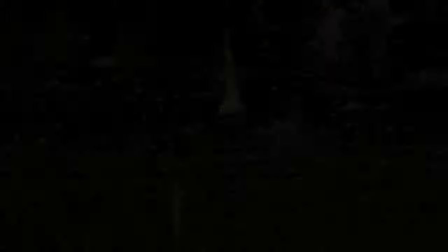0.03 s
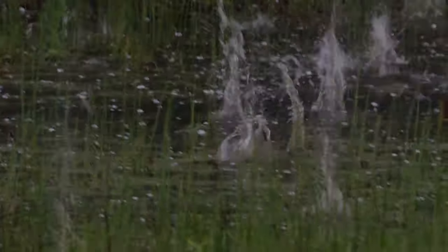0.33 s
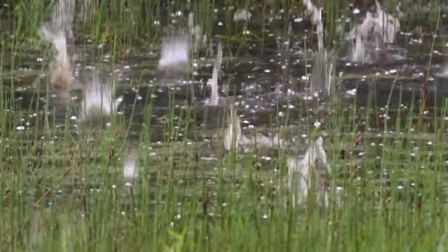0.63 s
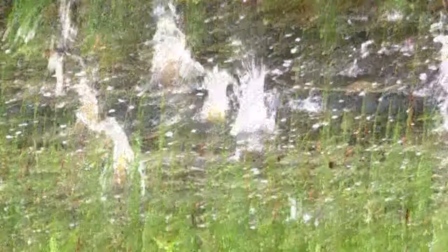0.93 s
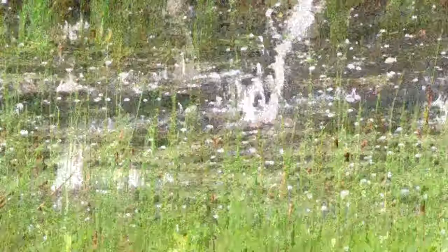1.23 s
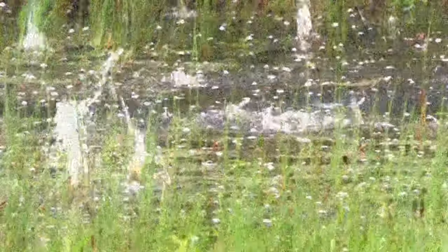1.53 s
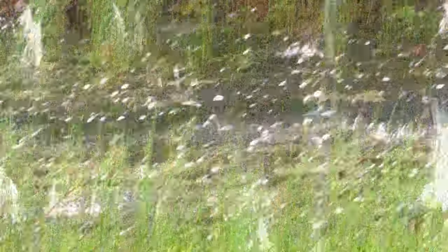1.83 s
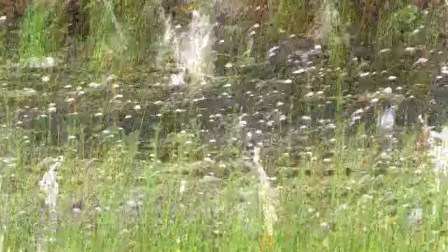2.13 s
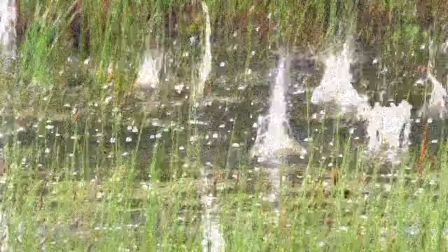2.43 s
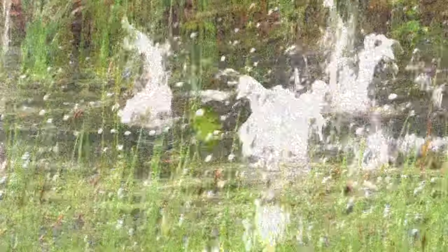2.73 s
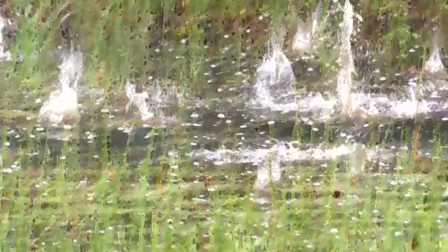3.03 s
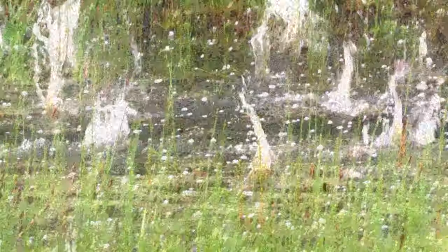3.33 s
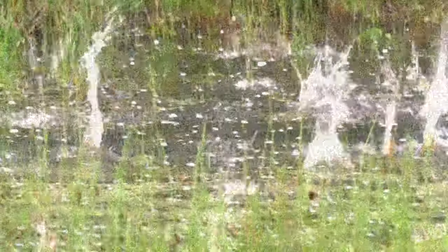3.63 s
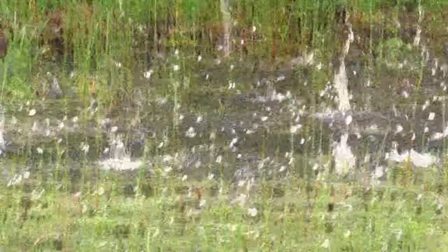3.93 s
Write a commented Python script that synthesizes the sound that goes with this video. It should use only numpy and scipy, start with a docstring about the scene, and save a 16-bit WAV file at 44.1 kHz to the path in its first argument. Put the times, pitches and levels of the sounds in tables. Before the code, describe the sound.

Heavy hail splashes into a reedy pond, thumping and plopping over a steady roar.

```python
"""Large hailstones pound a shallow pond with reeds, heard from a camera on the bank; the sound fades in.
Countless far splashes merge into a roar, with ticks of ice and ringing bubbles. Near stones thump, plunge and
splash, and thrown water patters back. The recorder has two narrow treble notches and overloads on the big hits."""
import sys
import numpy as np
from scipy import signal
from scipy.fft import rfft, irfft
from scipy.io import wavfile
from scipy.ndimage import uniform_filter1d

SR = 44100
rng = np.random.default_rng(int(sys.argv[2]) if len(sys.argv) > 2 else 0)


def log_audio(samples):
    """Write samples as a 16-bit WAV file to the path given in sys.argv[1]."""
    # one column per channel
    frames = np.atleast_2d(samples).T
    # limit to full scale, then quantise
    limited = np.clip(frames, -1, 1)
    pcm = np.round(limited * 32767).astype(np.int16)
    wavfile.write(sys.argv[1], SR, pcm)


N = 176400

# near stones: (s, plunge dB, splash dB, spray dB, rise time s, decay time s)
STONES = [(0.034, -9, -32, -40, 0.0018, 0.11), (.12, -14, -26, -40, .004, .04), (.19, -31, -15.5, -32, 0.012, 0.15), (0.361, -27, -13.5, -32, .008, 0.18), (.425, -14, -17, -18, 0.0072, 0.14), (0.495, -19, -2.5, -13, 0.0067, 0.094),
          (0.767, -14.5, -15, -22.5, 0.0076, 0.088), (1.005, -20, -17.5, -38, 0.0069, 0.15), (1.208, -12.5, -31, -22, .003, 0.067), (1.465, -22, -12.5, -40, .004, .04),
          (1.5, -22, -8.5, -24, .001, 0.13), (1.611, -17.5, -3.5, -14.5, 0.029, 0.089), (1.664, -10, -14, -25, 0.011, 0.14), (1.749, -10.5, -6, -19, 0.014, .07),
          (1.885, -14, -17, -16, 0.012, 0.078), (2.073, -3, -7, -32, 0.011, 0.042), (2.105, -17, -9.5, -24, 0.0063, .07), (2.14, -12.5, -17, -40, .006, 0.075), (2.26, -20.5, -28, -28, 0.0072, 0.12),
          (2.492, -9, -6, -9.5, .016, 0.071), (2.585, -15, -10.5, -21, 0.027, 0.1), (3.12, -37, -16.5, -37, 0.2, 0.23),
          (3.406, -19, -15, -24, 0.0078, .07), (3.566, -17, -40, -40, .005, .03), (3.59, -7.5, -1, -14, .001, 0.053), (3.629, -10, -7, -16, .003, 0.03), (3.73, -16.5, -16.5, -43, .006, 0.077),
          (3.857, -14, -18, -26, 0.0056, 0.094), (3.94, -13, -19, -22, 0.0092, 0.075)]
# deep thumps of collapsing craters: (s, dB, pitch Hz)
THUMPS = [(.04, -5, 109), (.515, -14, 114), (.625, -29, 100), (.78, -17.5, 109), (1.0, -14, 108), (1.209, -17, 116), (1.404, -18, 110),
          (1.631, -15, 104), (1.76, -20, 115), (2.075, -27, 123), (2.309, -20, 107), (2.441, -15.5, 113), (2.51, -17, 105),
          (3.568, -9, 111), (3.66, -12, 114.4)]
# plops of large air pockets: (s, dB, starting pitch Hz, decay time s)
PLOPS = [(0.511, -16, 910, .025), (1.22, -11.5, 418, 0.027), (2.088, -2, 1180, 0.014), (2.094, -5.5, 452, 0.012), (2.143, -9, 726, 0.017),
         (2.515, -11, 779, 0.026), (3.597, -4, 1298, .01), (3.631, -3, 857, 0.017)]
# thrown water falling back: (s of the peak, patter dB, sizzle dB, half length s)
SHOWERS = [(.27, -24, -44, 0.047), (0.628, -11, -30, 0.019), (0.676, -17, -46, 0.059), (0.97, -26, -32.5, .035), (1.162, -20.5, -30, 0.033), (1.356, -25, -44, .04), (1.563, -18, -32, 0.029),
           (1.804, -21, -25, 0.043), (1.886, -14.5, -33, 0.036), (2.24, -16, -32, 0.036), (2.341, -17, -25, 0.028), (2.94, -18, -35, 0.031), (3.38, -26, -34, 0.043)]
PING_S, PING_HZ, PING_DB, PING_DECAY_S = 1.5, 3340, 0.5, 0.0025  # one stone rings on something hard
# colours: (Hz, dB per Hz)
ROAR = [(20, -41), (45, -18), (75, -9.5), (110, 0), (180, -4), (330, 0), (700, -3), (1300, 1), (2400, 4.5), (3300, -4.5), (4800, -8), (6700, -7.5), (8600, -18.5), (11000, -25.5), (15000, -43.5)]
PLUNGE = [(30, -34), (110, -5.5), (300, -0.5), (550, -1), (950, -0.5), (1500, -4.5), (3000, -23.5), (12000, -61)]
SPLASH = [(50, -31), (400, -13), (900, -3), (1700, -0.5), (2700, 1.5), (3800, -7.5), (7000, -21), (14000, -51)]
SPRAY = [(100, -25), (1800, -17), (3400, 2.5), (5000, 2), (6800, 0.5), (8700, -3), (11000, -12.5), (15000, -35)]
SIZZLE = [(3000, -35), (8000, -1), (11300, -1), (13000, -9), (15000, -17)]
ROAR_DB, ROAR_SWELL_DB, ROAR_PATCHY_DB = -14, 0, 1.77
SPRAY_DECAY_SHARE = 0.69
PLOP_RISE_S, PLOP_GLIDE_PER_S, PLOP_WOBBLE = 0.0022, 5.04, 0.083
THUMP_RISE_S, THUMP_DECAY_S, THUMP_GLIDE_PER_S = 0.0072, 0.027, 0.63
FAR_PER_S, FAR_SPREAD_DB, FAR_DECAY_S = 60, 1.5, .02  # fixed
FAR_PLUNGE_DB, FAR_SPLASH_DB, FAR_SPRAY_DB = -26.5, -22.5, -27
TICKS_DB, TICKS_PER_S, TICK_SPREAD_DB = -25.5, 350, 4.2
BUBBLES_DB, BUBBLES_PER_S, BUBBLE_CYCLES, BUBBLE_GLIDE = -26, 190, 8.3, 0.032
# the two microphone ports: (Hz, likeness), (Hz, radians that left leads), (Hz, L-R dB)
SAME = [(30, 3.7), (400, 0.98), (550, 0.9), (800, 0.85), (1100, 0.46), (1500, 0.12), (2100, 0.3248), (3200, 0.2), (4300, -0.03), (5100, 0.24), (5700, 0.04), (6200, .2), (6400, 1.6), (6800, 1.6), (7050, .55), (7500, 1.04), (9400, 0.3), (10000, 0.2), (15000, 0.46)]
LEAD = [(30, 0), (500, 0), (1100, .35), (1500, 1.5), (2000, 3), (2700, 3.7), (3500, 3), (4200, 3.8), (4600, 6.1), (5200, 6.8), (6100, 6.28), (15000, 6.28)]  # fixed
BALANCE_DB = [(450, -0.5), (850, 0.1), (1400, -2), (2200, -4), (2700, -2), (3300, -0.5), (4000, -2), (5400, -3.5), (5900, -2.6), (6600, -4), (8300, 1.2), (9500, 0), (10000, 5), (11000, 7), (13500, 1.5)]
NOTCHES = [(7680, 1600), (9580, 1130)]  # (Hz, width Hz)
FADE_IN = [(.034, -67), (.037, -15), (.12, -9), (.2, -6), (.27, -3), (.4, -1.5)]  # (s, dB)
CLIP_KNEE, CEILING = .86, .93  # fixed
EDGE_HZ = 15600  # fixed
T, HZ = np.arange(N) / SR, np.fft.rfftfreq(N, 1 / SR)


def amp(db):
    """Decibels to gain."""
    return 10 ** (np.asarray(db) / 20)


def evened(x):
    """Scales to an rms of 1."""
    return x / np.sqrt(np.mean(x ** 2) + 1e-20)


def read(points, hz):
    """Reads a table along a log-frequency axis."""
    f, value = np.transpose(points)
    return np.interp(np.log(hz + 1), np.log(f + 1), value)


def add(mix, s, sound):
    """Mixes a sound in at a time."""
    part = mix[max(round(s * SR), 0):][:len(sound)]
    part += sound[:len(part)]


def colour(x, points):
    """Causal filter with the given spectrum; rms 1."""
    log_gain = np.log(amp(read(points, abs(np.fft.fftfreq(N, 1 / SR)))))
    return evened(irfft(rfft(x) * np.exp(np.conj(signal.hilbert(log_gain)))[:len(HZ)], N))


def clicks(per_s, spread_db, channels=2):
    """Random clicks of random sign: many small, a few large."""
    size = amp(spread_db * np.minimum(rng.exponential(1, (channels, N)), 4))  # fixed
    return size * (rng.random((channels, N)) < per_s / SR) * rng.choice([-1, 1], (channels, N))


def droplets(points, per_s, spread_db):
    """Water torn into drops: very dense clicks with one colour."""
    return colour(clicks(per_s, spread_db), points)


def burst(start, rise_s, decay_s):
    """A rise, then an exponential fall."""
    t = np.maximum(T - start, 0)
    return np.minimum(t / rise_s, 1) * np.exp(-np.maximum(t - rise_s, 0) / decay_s)


def roar():
    """Distant hail merged into a wash that shifts in patches."""
    z = signal.stft(rng.standard_normal((2, N)), nperseg=512, noverlap=384)[2]  # fixed
    frames = z.shape[2]
    patches = evened(uniform_filter1d(uniform_filter1d(rng.standard_normal((frames, z.shape[1])), size=20, axis=0), size=9, axis=1))
    swell = evened(uniform_filter1d(rng.standard_normal(frames), size=50))
    z = z * amp(ROAR_PATCHY_DB * patches.T + ROAR_SWELL_DB * swell)
    return amp(ROAR_DB) * colour(signal.istft(z, nperseg=512, noverlap=384)[1][:, :N], ROAR)  # fixed


def far_stones():
    """Stones at middle distance: short splashes, each with its own mix of plunge, splash and spray."""
    hits, out = clicks(FAR_PER_S, FAR_SPREAD_DB, channels=1)[0] ** 2, 0
    for points, db in (PLUNGE, FAR_PLUNGE_DB), (SPLASH, FAR_SPLASH_DB), (SPRAY, FAR_SPRAY_DB):
        power = signal.lfilter([1], [1, -np.exp(-2 / (FAR_DECAY_S * SR))], hits * rng.uniform(0, 1, N))
        out = out + amp(db) * evened(np.sqrt(power)) * droplets(points, per_s=7000, spread_db=3)
    return out


def near_stones():
    """Each big stone makes a hollow plunge, a splash and a shorter bright spray; some slap, others roll in."""
    plunge = splash = spray = 0
    for start, plunge_db, splash_db, spray_db, rise_s, decay_s in STONES:
        shape = burst(start, rise_s, decay_s)
        plunge = plunge + (amp(plunge_db) * shape) ** 2
        splash = splash + (amp(splash_db) * shape) ** 2
        spray = spray + (amp(spray_db) * burst(start, rise_s, decay_s * SPRAY_DECAY_SHARE)) ** 2
    return (np.sqrt(plunge) * droplets(PLUNGE, per_s=6000, spread_db=2.5) + np.sqrt(splash) * droplets(SPLASH, per_s=6000, spread_db=2.5)
            + np.sqrt(spray) * droplets(SPRAY, per_s=8000, spread_db=5.5))


def showers():
    """Thrown water patters back in soft bright swells, topped by a sizzle of the finest drops."""
    patter = sizzle = 0
    for s, patter_db, sizzle_db, half_s in SHOWERS:
        swell = np.exp(-((T - s) / half_s) ** 2)
        patter = patter + amp(patter_db) ** 2 * swell
        sizzle = sizzle + amp(sizzle_db) ** 2 * swell
    return np.sqrt(patter) * droplets(SPRAY, per_s=5000, spread_db=2.0) + np.sqrt(sizzle) * droplets(SIZZLE, per_s=1500, spread_db=3.5)


def thumps():
    """The crater of a big stone collapses with a low note that rises a little."""
    out, t = np.zeros(N), T[:SR // 4]
    shape = np.minimum(t / THUMP_RISE_S, 1) * np.exp(-t / THUMP_DECAY_S)
    for s, db, hz in THUMPS:
        add(out, s, amp(db) * shape * np.sin(2 * np.pi * hz * t * (1 + THUMP_GLIDE_PER_S * t)))
    return out


def ticks():
    """Small ice pellets tick on the reeds and the water."""
    pellet = [(100, -18), (600, 0.0), (2500, 10.5), (6500, -6.5), (10000, -14), (15000, -32.0)]  # (Hz, dB per Hz)
    return amp(TICKS_DB) * colour(clicks(TICKS_PER_S, TICK_SPREAD_DB), pellet)


def bubbles(low_hz=270, high_hz=3200, count=28):
    """Trapped air rings for a few cycles, rising in pitch."""
    hits, kind, t = clicks(BUBBLES_PER_S, spread_db=2.5), rng.integers(0, count, N), T[:SR // 8]
    out = 0
    for k, hz in enumerate(np.geomspace(low_hz, high_hz, count)):
        age = t * hz / BUBBLE_CYCLES
        ring = np.exp(-age) * (1 - np.exp(-t * hz)) * np.sin(2 * np.pi * hz * t * (1 + BUBBLE_GLIDE * age))
        out = out + signal.oaconvolve(hits * (kind == k), ring[None], axes=1)[:, :N]
    return amp(BUBBLES_DB) * evened(out)


def ping():
    """A short hard ring, to the left."""
    t = np.maximum(T - PING_S, 0) / PING_DECAY_S
    return amp([[PING_DB], [PING_DB - 4.0]]) * 2 * np.sqrt(t) * np.exp(-t) * np.sin(2 * np.pi * PING_HZ * T)


def ports(field):
    """Two close ports hear the bass alike and the treble apart."""
    a, b = rfft(field)
    same, tilt = np.clip(read(SAME, HZ), -1, 1), amp(read(BALANCE_DB, HZ) / 2)
    right = (same * a + np.sqrt(1 - same ** 2) * b) * np.exp(-1j * read(LEAD, HZ))
    return irfft(np.array([a * tilt, right / tilt]), N)


def plops():
    """A big stone traps a pocket of air that rings, wobbles and rises in pitch as it nears the surface."""
    out, t = np.zeros(N), T[:SR // 6]
    for s, db, hz, decay_s in PLOPS:
        shape = np.minimum(t / PLOP_RISE_S, 1) * np.exp(-t / decay_s)
        wobble = evened(uniform_filter1d(rng.standard_normal(len(t)), size=120))
        turns = np.cumsum(hz * (1 + PLOP_GLIDE_PER_S * t + PLOP_WOBBLE * wobble)) / SR
        add(out, s, amp(db) * shape * np.sin(2 * np.pi * turns))
    return out


def scene():
    """All of the hail on the pond."""
    return ports(roar() + far_stones() + near_stones() + showers() + ticks() + bubbles()) + thumps() + plops() + ping()


def record(dry):
    """Treble notches, fade-in, overload and the band limit."""
    x = dry
    for hz, width in NOTCHES:
        x = signal.lfilter(*signal.iirnotch(hz, hz / width, SR), x)
    x = x * amp(np.interp(T, *np.transpose(FADE_IN)))
    room = max(CEILING - CLIP_KNEE, .01)
    x = np.sign(x) * (np.minimum(abs(x), CLIP_KNEE) + room * np.tanh(np.maximum(abs(x) - CLIP_KNEE, 0) / room))
    return signal.oaconvolve(x, signal.firwin(511, EDGE_HZ, window=("kaiser", 9), fs=SR)[None], "same")  # fixed


dry = scene()
out = record(dry)
log_audio(out)
```